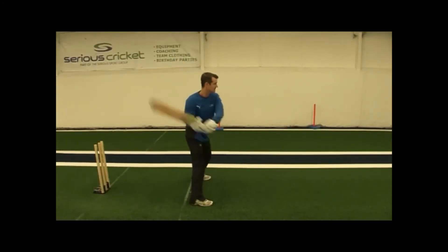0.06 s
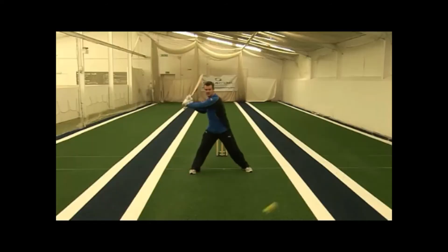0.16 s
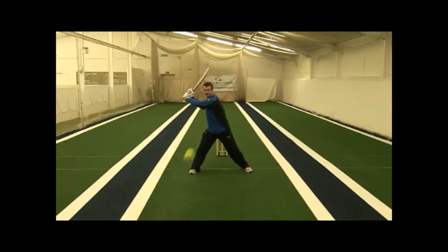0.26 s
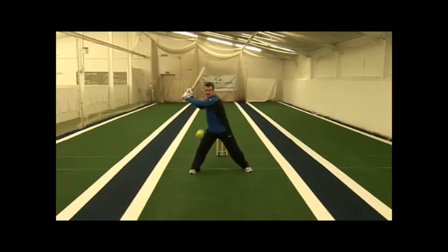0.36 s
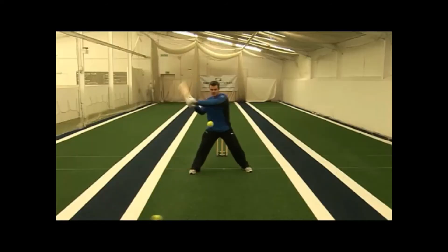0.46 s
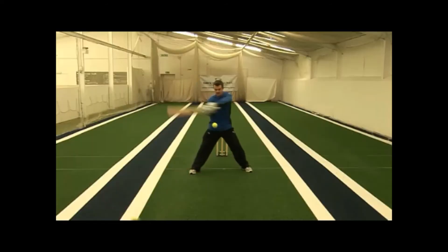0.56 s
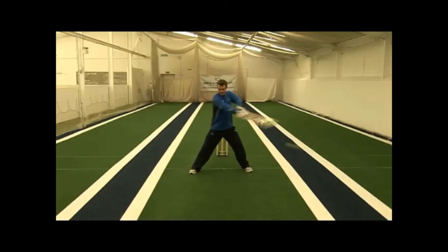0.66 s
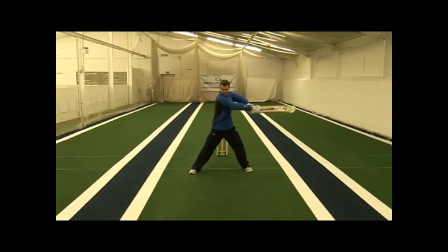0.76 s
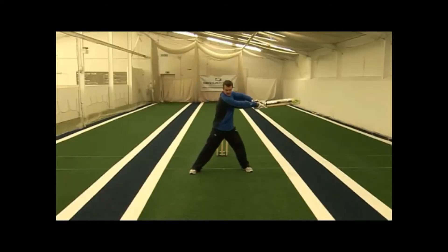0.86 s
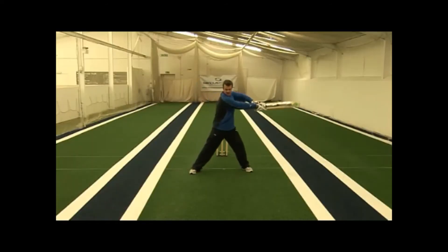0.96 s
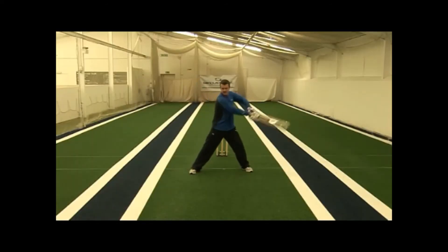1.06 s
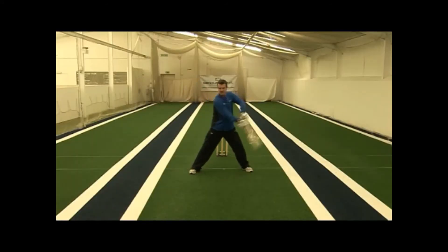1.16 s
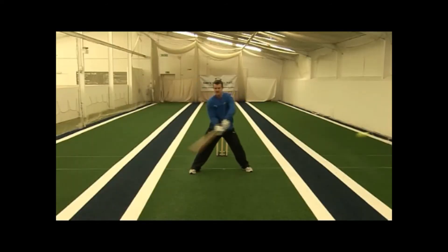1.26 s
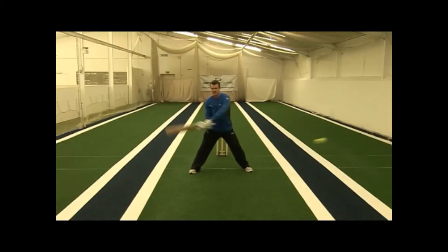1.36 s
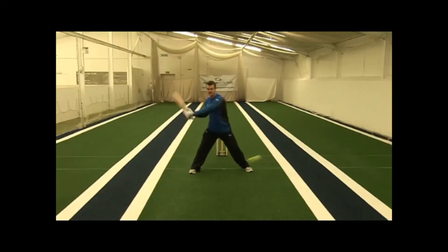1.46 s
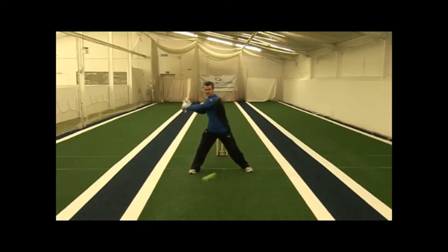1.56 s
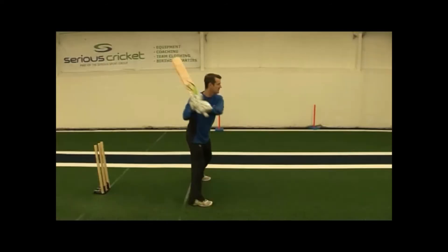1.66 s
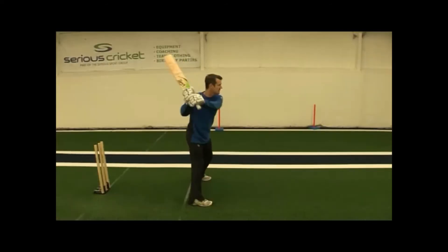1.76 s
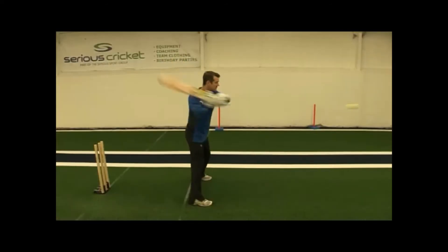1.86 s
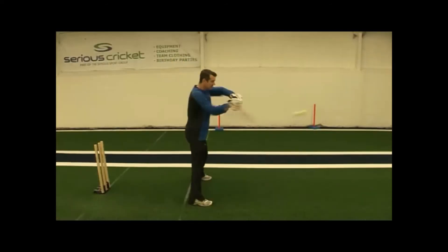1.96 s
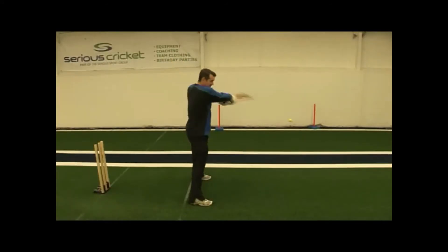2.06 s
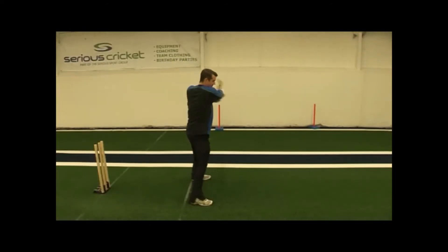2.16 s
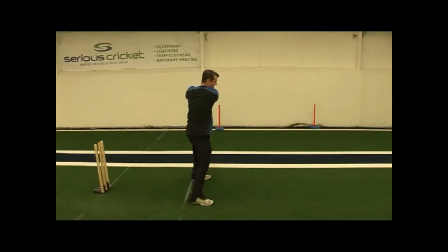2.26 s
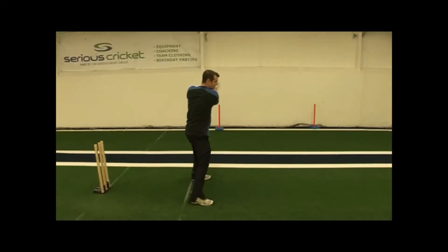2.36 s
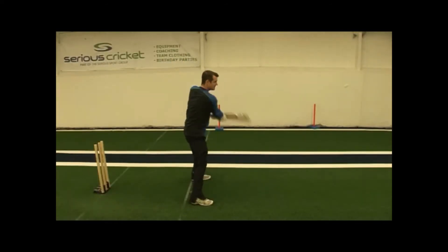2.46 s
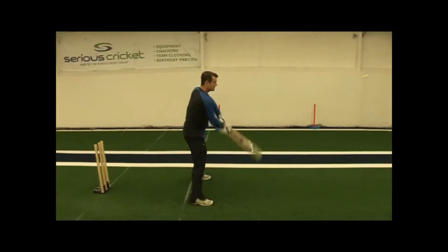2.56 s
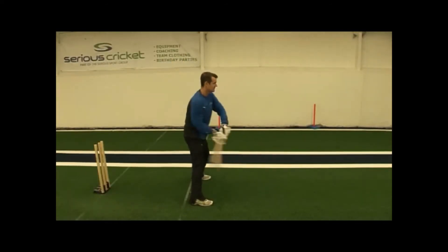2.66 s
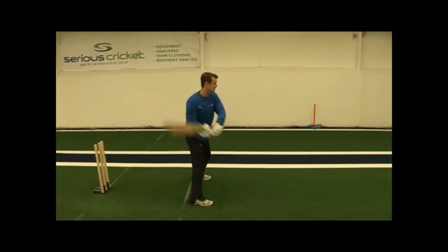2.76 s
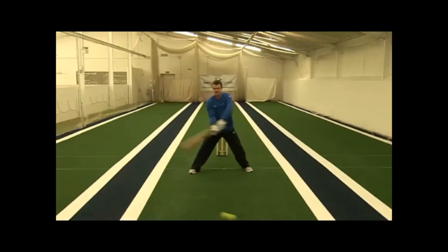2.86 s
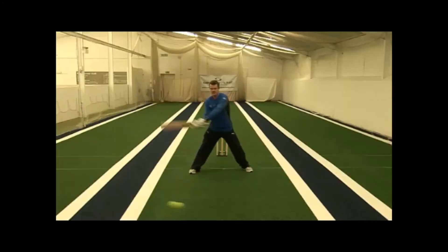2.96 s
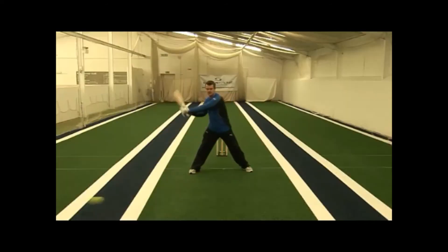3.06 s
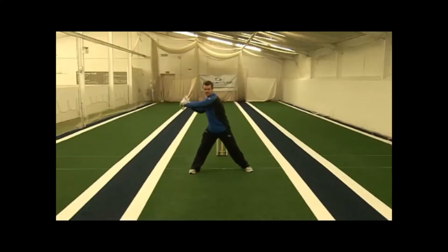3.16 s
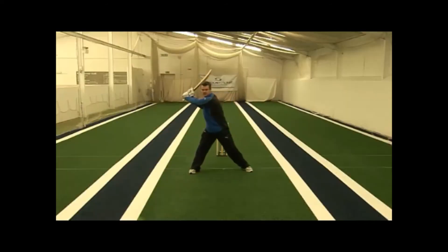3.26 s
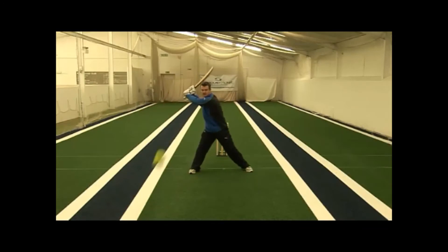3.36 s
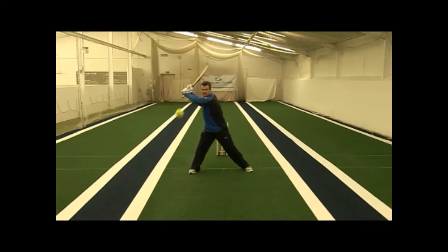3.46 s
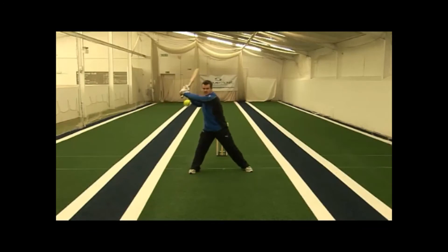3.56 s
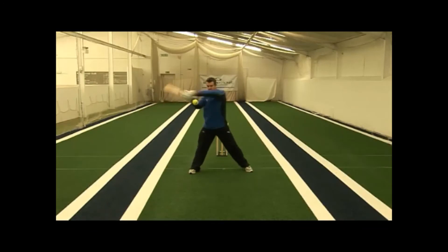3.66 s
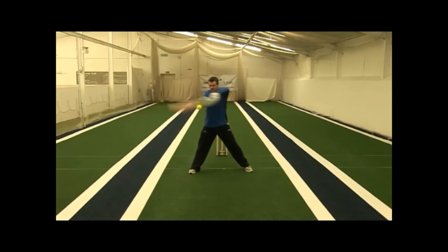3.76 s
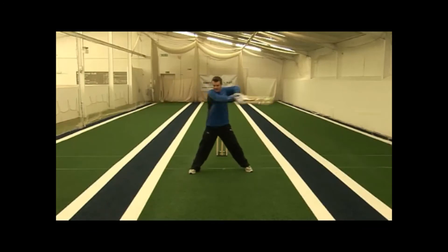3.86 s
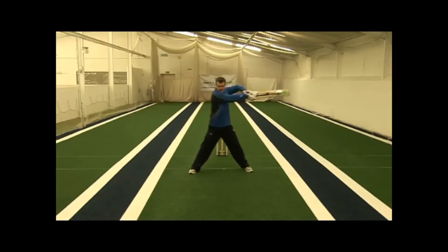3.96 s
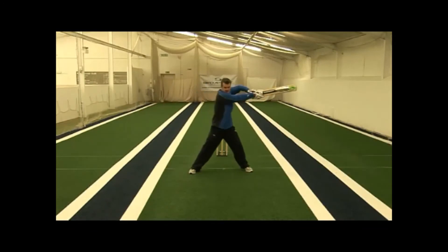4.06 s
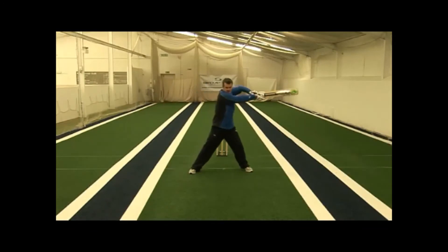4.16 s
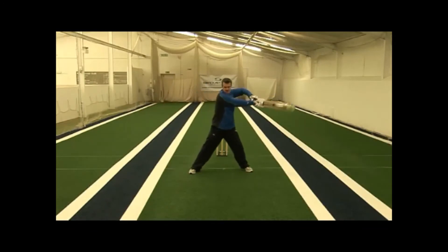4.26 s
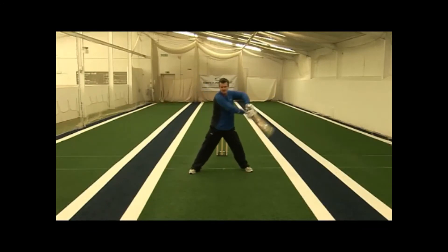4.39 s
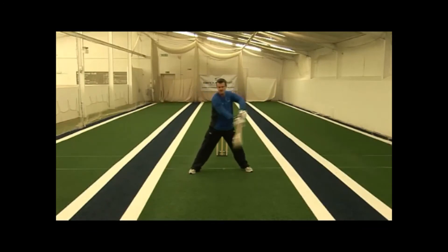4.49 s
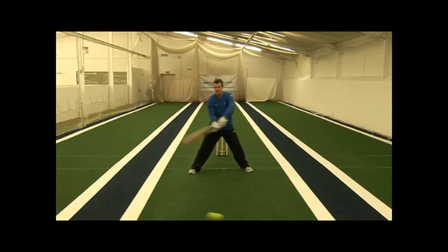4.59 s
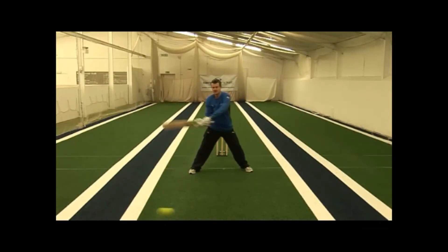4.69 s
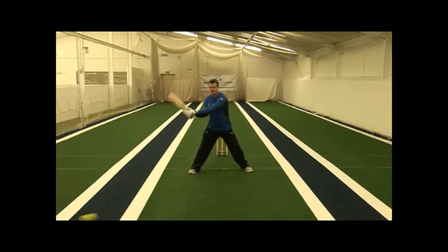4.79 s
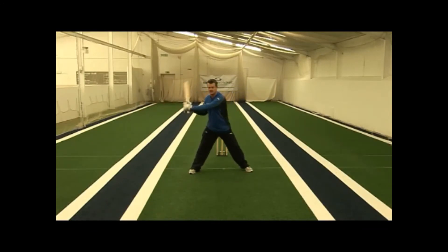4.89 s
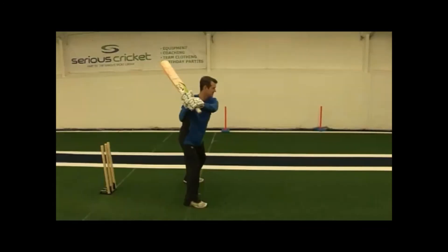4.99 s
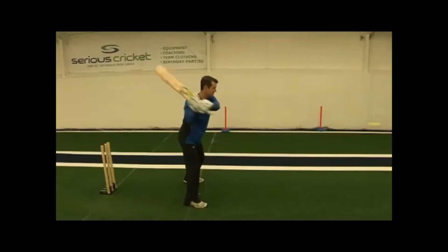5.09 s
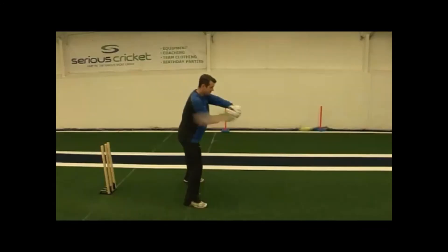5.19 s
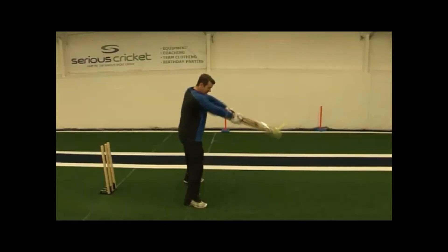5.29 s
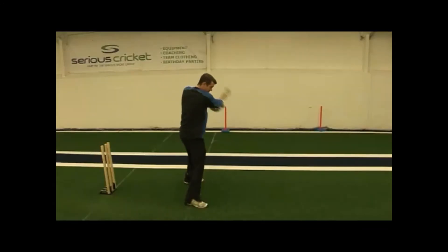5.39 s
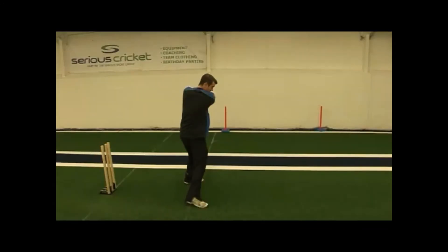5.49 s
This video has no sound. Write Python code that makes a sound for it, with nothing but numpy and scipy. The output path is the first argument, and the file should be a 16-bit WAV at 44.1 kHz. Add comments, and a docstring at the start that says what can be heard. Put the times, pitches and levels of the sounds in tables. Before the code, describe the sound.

In a large indoor practice hall, a ball bounces softly on turf and a wooden bat hits it with a sharp, echoing crack. Four strokes come about a second and a half apart, each followed by one or more thuds against the wall. After the first, a steel net frame rings faintly. Quiet ventilation runs throughout. A microphone worn by the batter, mostly left, catches slight swishes and wind; a distant one sits mostly right.

```python
"""A long indoor net hall, batting practice. A lobbed ball bounces on the turf, cracks off a willow bat
and thuds into the wall or the steel net frame: damped modes under a short crack, then the hall's echoes.
Ventilation runs behind it all. The camera microphone stands some metres off, mostly in the right channel.
A lapel microphone on the batsman, mostly left, hears each stroke first and takes the wind of the swing."""
import sys
import numpy as np
from scipy import signal
from scipy.fft import rfft, irfft
from scipy.io import wavfile

SR = 44100
rng = np.random.default_rng(int(sys.argv[2]) if len(sys.argv) > 2 else 0)


def unload_wav(signal):
    """Save mono or channel-first audio to the path in sys.argv[1] as 16-bit WAV at rate SR, clipped to [-1, 1]."""
    wavfile.write(
        sys.argv[1],
        SR,
        np.round(np.clip(np.atleast_2d(signal).T, -1, 1) * 32767).astype(np.int16),
    )


N = 243866

# Spectra of ventilation, lapel rumble, cloth and bat swish, and ball crack: (frequency [Hz], level [dB])
VENTILATION = [(20, -13), (60, -8.5), (150, -1.5), (300, -4), (450, -0.5), (700, -5.5), (1200, -15),
               (2100, -20), (6000, -26.5), (12000, -35)]
LAPEL_RUMBLE = [(15, -25.5), (35, -3), (60, -2), (120, -10.5), (300, -29.5), (1000, -57), (4000, -82)]
SWISH_SPECTRUM = [(200, -11), (600, 6.5), (1800, 6), (3500, 0), (7000, -2.5), (12000, -17)]
CRACK_SPECTRUM = [(300, -2), (1000, -17), (2000, 2), (3500, -11.5), (6500, -8.5), (10000, -12.5),
                  (13000, -33.5)]
# Spectra of wind on the lapel capsule and of early reflections: (frequency [Hz], level [dB])
WIND = [(15, -35.5), (30, -8), (50, 3.5), (80, -5), (120, -8), (300, -20), (1000, -56), (4000, -86.5)]
REFLECTIONS = [(150, -3.5), (400, 2.5), (1500, 1.5), (4000, -4.5), (10000, -11)]
# Level wander of the room tone and clumping of the hall's echoes: (rate [Hz], level [dB])
WANDER = [(1, -94.5), (3, 93.5), (12, 12), (40, -120)]
CLUMPS = [(10, -5.5), (150, -12), (400, -31), (1500, -75)]
# Bands of the hall's tail: (frequency [Hz], level [dB], t60 [s])
HALL_BANDS = [(61.5, -16, 1.0), (126.5, -5, 1.6), (218, 9.5, 0.91), (333, 3, 1.44), (700, 2.5, 1.37),
              (1240, -1, 1.61), (2430, 1, 1.465), (5000, -1.5, 1.3), (8240, -1.5, 0.95),
              (11500, -15.5, 2.2)]
# Depth of the fine random ripple in the echo tail's spectrum: (frequency [Hz], spread [dB])
TAIL_RIPPLE = [(300, 5.5), (1500, 4), (7000, 6)]
# Modes of the bat, wall, ball and steel frame: (frequency [Hz], level [dB], t60 [s])
BAT_MODES = [(327.7, -2.5, 0.023), (503, -3, 0.035), (539, 1.5, 0.022), (800, 3.5, 0.011),
             (1154, -6.5, 0.017), (1400, -3.5, 0.0045), (2448, -12.5, 0.013), (2700, -27, 0.015),
             (3304, -9.5, 0.011), (4830, -17, 0.012), (5970, -11, 0.0067), (6600, -21, 0.016)]
WALL_MODES = [(240.5, -2.5, 0.03), (410, 2.5, 0.02), (629, 0.5, 0.034), (956, -3, 0.044), (1100, 1, 0.019),
              (1532, 6.5, 0.0052), (1884, 0, 0.0089), (2380, -25.5, 0.0088)]
BALL_MODES = [(352, 8, 0.01), (532, 8, 0.0071), (830, 3.5, 0.0066), (1360, 9.5, 0.0038), (1813, -6, 0.012)]
FRAME_MODES = [(1087, 0, 1.05), (1270, -7, 1.1), (1669, -10, .75), (1814, -17, 1.2)]
# Clothes rustle as the bat lifts: (peak time [s], rise [s], fall [s], camera [dB], lapel [dB], treble [dB])
BACKLIFT_RUSTLES = [(0.06, 0.27, 0.074, -55, -69, -10), (1.79, 0.17, 0.12, -54, -63, 5.5),
                    (4.925, 0.11, 0.021, -55.5, -50.5, -11.5)]
# One swing a stroke: (stride rustle [dB], camera swish [dB], lapel swish [dB], wind [dB], follow wind [dB])
SWING_LEVELS = [(-65, -50.5, -56.5, -45, -58), (-76, -43.5, -36.5, -34.5, -17.5),
                (-65.5, -49.5, -48.5, -47, -59), (-55, -47, -48, -39, -41)]
# Follow-through and recoil of the arms buffet the lapel: (delay [s], half length [s], level [dB])
BUFFETS = [(0.064, .018, -5.5), (0.31, 0.017, -22)]
# The ball lands on the turf, or hits the side wall and net frame; the last five columns are relative:
# (time [s], level [dB], bass [dB], upper modes [dB], crack [dB], room [dB], lapel [dB])
TURF_BOUNCES = [(.2658, -17.5, -15.5, -5, -16, -14, -39), (2.8670, -41.5, -8, -2.5, -18.5, 17.5, 1),
                (3.4368, -32, 9, 26, -49, -12, -29), (4.4275, -12, -16, -5, -19, -16, -11)]
WALL_THUDS = [(.8235, -21, 6.5, 10, -14.5, -1, -18), (.8440, -11.5, 0, -9, -30, -16.5, -30),
              (.9211, -3.5, 6, 4.5, -24.5, -13, -12.5), (2.2335, -18, 4.5, -4.5, -8.5, 1, -3),
              (2.2395, -11, 10, -1, -6.5, -15.5, -28), (2.2565, -18, 0.5, -8.5, -9, -5.5, -16),
              (4.0375, 3.5, -5.5, -5, -22.5, -12, -33.5), (4.1040, -23.5, -11.5, -18, -7.5, 0, -14),
              (4.1745, -20.5, 3.5, 1, -13.5, -1.5, -9), (4.2455, -19, -4, -1.5, -28.5, -2, -6),
              (5.4957, 2.5, -11.5, -3, -13, -13, -16.5), (5.5055, -12.5, 6.5, 4, -16, -20, 0)]
# Bat meets ball: (time at the camera [s], level [dB], bass [dB], upper modes [dB], crack [dB],
# crack treble [dB], early reflections [dB], hall [dB], lapel lead [s], lapel [dB])
BAT_STROKES = [(.6453, -1.5, 10, 13, -10, -6.5, -3, -6, 0.014, -12.5),
               (2.0136, -1, -0.5, 3.5, -6, 3.5, -19, -5.5, .0087, -4.5),
               (3.8047, 0, 3.5, 8, -10.5, -5, -3.5, -4.5, .0143, -11.5),
               (5.2761, 2, 5.5, 11, -8.5, -1.5, -13, -5, 0.0074, -11.5)]
# Slap off the nearest wall, one a stroke: (delay [s]) and (level [dB], smear t60 [s])
WALL_SLAP_DELAYS = [.0162, .0283, .0122, .0283]
WALL_SLAPS = [(-8, 0.0052), (0, 0.022), (-25, 0.019), (-0.5, 0.052)]


def amp(db):
    """Decibels to gain."""
    return 10 ** (np.asarray(db) / 20)


def fade(t, t60):
    """Exponential decay, 60 dB down after t60."""
    return np.exp(-np.log(1000) * t / t60)


def bump(t, half_s):
    """A smooth swell of height 1 around t = 0."""
    return np.exp(-(t / half_s) ** 2)


def along(hz, points):
    """Read (frequency, value) points on a log-frequency axis."""
    f, value = np.transpose(points)
    return np.interp(np.log(np.maximum(hz, 1)), np.log(f), value)


def noise(points, size, treble_db=0):
    """Noise of rms 1 with the given spectrum and a treble shelf."""
    hz = np.arange(size // 2 + 1) * SR / size
    db = along(hz, points) + along(hz, [(3000, 0.0014), (10000, treble_db)])
    x = irfft(rfft(rng.standard_normal(size)) * amp(db), size)
    return x / x.std()


def unit(x):
    """Scale to an energy of 1."""
    return x / np.sqrt(np.sum(x ** 2))


def add(track, s, x):
    """Mix x into the track from time s on."""
    i = int(np.clip(s * SR, 0, N - 1))
    track[i:i + len(x)] += x[:N - i]


def room_tone(camera_db=-56.5, lapel_db=-64, rumble_db=-63.5, wander_db=1):
    """Gently wavering ventilation on both microphones, with a low rumble on the lapel."""
    swell = amp(wander_db * noise(WANDER, N))
    lapel = amp(lapel_db) * noise(VENTILATION, N) + amp(rumble_db) * noise(LAPEL_RUMBLE, N)
    camera = amp(camera_db) * noise(VENTILATION, N)
    return swell * np.array([lapel, camera])


def tail_ripple(hz, count=420):
    """Fine random ripple over frequency that gives the echo tail a faintly striped, metallic colour."""
    uneven = np.interp(hz, np.linspace(0, SR / 2, count), rng.standard_normal(count))
    spread_db = along(hz, TAIL_RIPPLE)
    return amp(spread_db * uneven) / np.exp(np.log(amp(spread_db)) ** 2 / 2)


def hall_tail(build_s=0.015, clump_db=1.5, far_wall_s=0.2, far_width_s=0.083, far_db=3, size=72000):
    """Diffuse echoes come in clumps and swell once as sound returns from the far end of the hall."""
    t = np.arange(size) / SR
    hz = np.arange(size // 2 + 1) * SR / size
    echoes = rng.standard_normal(size) * amp(clump_db * noise(CLUMPS, size))
    spectrum = rfft(echoes) * tail_ripple(hz)
    tail = 0
    for band_hz, db, t60 in HALL_BANDS:
        share = along(hz, [(row[0], row[0] == band_hz) for row in HALL_BANDS])
        tail = tail + amp(db) * irfft(spectrum * share, size) * fade(t, t60)
    swell = amp(far_db * bump(t - far_wall_s, far_width_s))
    return unit(tail * swell * (1 - np.exp(-t / build_s)))


def early_reflections(t60=0.25, build_s=0.0018, grain=0.6, size=8192):
    """Uneven close echoes off floor, nets and roof."""
    t = np.arange(size) / SR
    echoes = noise(REFLECTIONS, size) * np.exp(grain * rng.standard_normal(size))
    return unit(echoes * fade(t, t60) * (1 - bump(t, build_s)))


def wall_slap(x, smear_s, low_hz=700, low_share=0.18, size=2048):
    """The nearest wall returns a thin copy of the crack, smeared by its clutter."""
    t = np.arange(size) / SR
    wall = unit(rng.standard_normal(size) * fade(t, smear_s)) + (t == 0)
    thin = signal.sosfilt(signal.butter(1, low_hz, "high", fs=SR, output="sos"), x)
    return signal.fftconvolve(low_share * x + (1 - low_share) * thin, unit(wall))


def backlifts():
    """The batsman's clothes rustle on both microphones as he lifts the bat."""
    t = np.arange(N) / SR
    lapel, camera = np.zeros((2, N))
    for s, rise_s, fall_s, camera_db, lapel_db, treble_db in BACKLIFT_RUSTLES:
        lift = bump(t - s, np.where(t < s, rise_s, fall_s))
        for track, db in ((camera, camera_db), (lapel, lapel_db)):
            track += amp(db) * noise(SWISH_SPECTRUM, N, treble_db) * lift
    return np.array([lapel, camera])


def foot_stamp(s=5.24, hz=210, db=-33, t60=0.41):
    """One stamp of the front foot reaches the camera as a low, dying tone."""
    t = np.arange(N) / SR
    lapel, camera = np.zeros((2, N))
    add(camera, s, amp(db) * np.sin(2 * np.pi * hz * t) * fade(t, t60))
    return np.array([lapel, camera])


def swings(stride_lead_s=0.11, downswing_s=0.089, slowing_s=0.042, swish_power=1.4, treble_db=-3.5,
           wind_rise_db_per_s=190, wind_fall_db_per_s=131.5, stride_wind_db=-54):
    """A stride, then the bat speeds up to contact and slows; it swishes, and wind buffets the lapel."""
    t = np.arange(N) / SR
    lapel, camera, gust = np.zeros((3, N))
    for stroke, (stride_db, camera_db, lapel_db, wind_db, follow_db) in zip(BAT_STROKES, SWING_LEVELS):
        since = t - stroke[0]
        stride = amp(stride_db) * bump(since + stride_lead_s, half_s=0.023)
        speed = np.interp(since, [-downswing_s, 0, slowing_s], [0, 1, 0])
        camera += stride + amp(camera_db) * speed ** swish_power
        lapel += stride + amp(lapel_db) * speed ** swish_power
        gust += amp(wind_db + np.minimum(wind_rise_db_per_s * since, -wind_fall_db_per_s * since))
        gust += amp(stride_wind_db) * bump(since + stride_lead_s, half_s=0.055)
        for delay_s, half_s, db in BUFFETS:
            gust += amp(follow_db + db) * bump(since - delay_s, half_s)
    wind = gust * noise(WIND, N)
    lapel *= noise(SWISH_SPECTRUM, N, treble_db)
    camera *= noise(SWISH_SPECTRUM, N, treble_db)
    return np.array([lapel + wind, camera])


def net_frame(s=.9215, level_db=-35.5, lapel_db=-8, diffuse=0.5, size=60000):
    """One ball sets a steel tube of the net frame ringing; the hall makes the ring waver."""
    t = np.arange(size) / SR
    mics = np.zeros((2, N))
    for track, mic_db in zip(mics, (lapel_db, 0)):
        for hz, db, t60 in FRAME_MODES:
            wash = noise([(hz - 45, -60), (hz, 0), (hz + 45, -60)], size)
            ring = np.sin(2 * np.pi * hz * t) + diffuse * wash
            add(track, s, amp(level_db + mic_db + db) * ring * fade(t, t60))
    return mics


def blow(modes, bass_db, upper_db, crack_db, treble_db, rise_s=.0001, floor_share=.45,
         floor_lag_s=.0013, click_hz=3200, click_db=10, detune=0.043, size=4096):
    """One impact: heavily damped modes under a contact click and a short crack that the floor repeats."""
    t = np.arange(size) / SR
    ring = 0
    for k, (hz, db, t60) in enumerate(modes):
        db = db + along(hz, [(270, bass_db), (600, 0.0053), (1200, upper_db)])
        hz = hz * (1 + detune * rng.standard_normal())
        ring = ring - (-1) ** k * amp(db) * np.sin(2 * np.pi * hz * t) * fade(t, t60)
    ring = ring * (1 - np.exp(-t / rise_s))
    click = np.sin(2 * np.pi * click_hz * t) * (t < 1 / click_hz)
    crack = noise(CRACK_SPECTRUM, size, treble_db) * fade(t, t60=.014) + amp(click_db) * click
    crack = crack + floor_share * np.roll(crack, int(floor_lag_s * SR))
    return ring / np.abs(ring).max() + amp(crack_db) * crack


def radiated_pulse(modes, colour, directions=16):
    """What a blow sends into the hall: the mean power over many directions, as one causal pulse."""
    blows = [blow(modes, *colour, floor_share=0) for _ in range(directions)]
    power = np.mean(np.abs(rfft(blows)) ** 2, axis=0)
    # folding the cepstrum gives minimum phase, so the energy comes at the start
    cepstrum = irfft(np.log(power + 1e-12) / 2)
    cepstrum[1:len(power) - 1] *= 2
    cepstrum[len(power):] = 0
    return irfft(np.exp(rfft(cepstrum)))


def impacts(rows, modes, slaps=(), camera_early_db=-3, camera_hall_db=-3,
            lapel_early_db=-13, lapel_hall_db=-12, shade_db=-11):
    """Each blow reaches both microphones directly, then by way of nearby surfaces and the hall."""
    lapel, camera = np.zeros((2, N))
    lapel_hall, camera_hall = hall_tail(), hall_tail()
    for k, row in enumerate(rows):
        s, db, bass_db, upper_db, crack_db, treble_db, early_db, late_db, lead_s, lapel_db = row
        colour = bass_db, upper_db, crack_db, treble_db
        pulse = amp(db) * radiated_pulse(modes, colour)
        add(camera, s, amp(db) * blow(modes, *colour))
        add(camera, s, signal.fftconvolve(pulse, amp(early_db + camera_early_db) * early_reflections()))
        add(camera, s, signal.fftconvolve(pulse, amp(late_db + camera_hall_db) * camera_hall))
        if slaps:
            delay_s, (slap_db, smear_s) = slaps[k]
            add(camera, s + delay_s, amp(slap_db) * wall_slap(pulse, smear_s))
        # body and shirt shade the lapel microphone from the crack and round the attack
        shaded = blow(modes, bass_db, upper_db, crack_db + shade_db, treble_db, rise_s=0.0025)
        add(lapel, s - lead_s, amp(db + lapel_db) * shaded)
        # reflections take about as long to reach either microphone
        add(lapel, s, signal.fftconvolve(pulse, amp(early_db + lapel_early_db) * early_reflections()))
        add(lapel, s, signal.fftconvolve(pulse, amp(late_db + lapel_hall_db) * lapel_hall))
    return np.array([lapel, camera])


def ball_hits(rows, modes, treble_db, near_db, lead_s, early_limit_db=14):
    """The ball on one surface: close echoes follow the room level to a limit; far hits are mostly hall."""
    hits = []
    for s, db, bass_db, upper_db, crack_db, room_db, lapel_db in rows:
        early_db = min(room_db + near_db, early_limit_db)
        hits.append((s, db, bass_db, upper_db, crack_db, treble_db, early_db, room_db, lead_s, lapel_db))
    return impacts(hits, modes)


def bat_strokes():
    """Willow cracks on the ball close to the lapel; the camera also gets a slap off the nearest wall."""
    return impacts(BAT_STROKES, BAT_MODES, slaps=list(zip(WALL_SLAP_DELAYS, WALL_SLAPS)))


def scene():
    """The hall from two positions: (lapel microphone, camera microphone)."""
    thuds = ball_hits(WALL_THUDS, WALL_MODES, treble_db=-8, near_db=3, lead_s=0.00554)
    bounces = ball_hits(TURF_BOUNCES, BALL_MODES, treble_db=-2.5, near_db=5.5, lead_s=0.00099)
    return bat_strokes() + thuds + bounces + net_frame() + backlifts() + foot_stamp() + swings() + room_tone()


def record(dry, low_cut_hz=110, ceiling=.74, bleed=.24, top_hz=11650):
    """Low cut on the camera; peaks are rounded, each microphone bleeds across, and the top is cut."""
    lapel, camera = dry
    camera = signal.sosfilt(signal.butter(2, low_cut_hz, "high", fs=SR, output="sos"), camera)
    lapel, camera = ceiling * np.tanh(np.array([lapel, camera]) / ceiling)
    mix = np.array([lapel + bleed * camera, camera + bleed * lapel])
    return signal.sosfilt(signal.ellip(8, .2, 65, top_hz, fs=SR, output="sos"), mix)


dry = scene()
out = record(dry)
unload_wav(out)
```